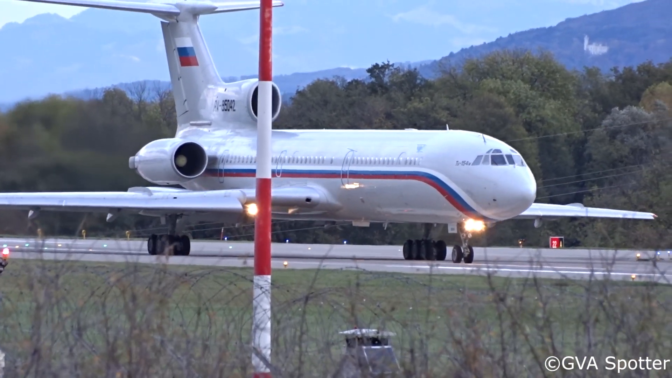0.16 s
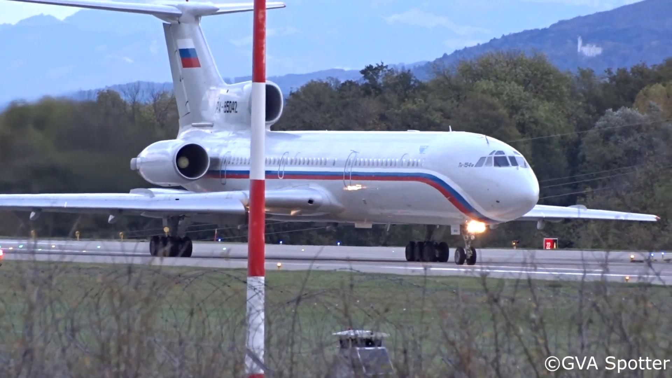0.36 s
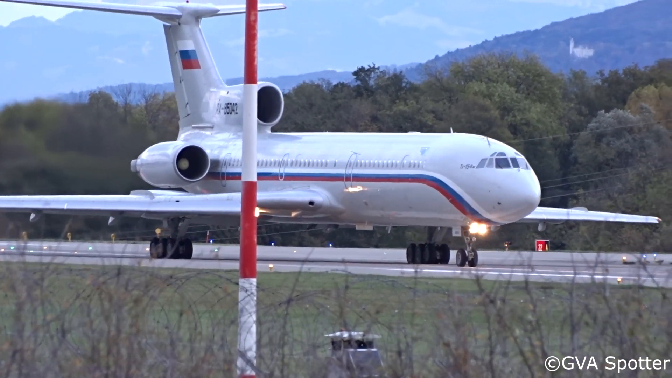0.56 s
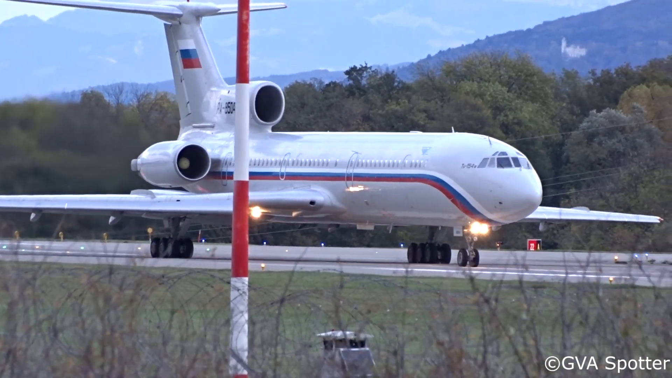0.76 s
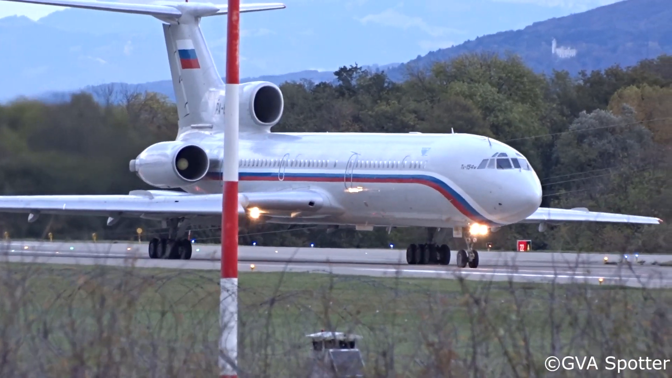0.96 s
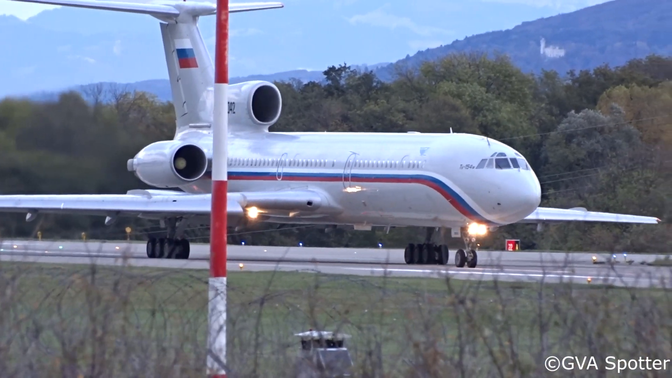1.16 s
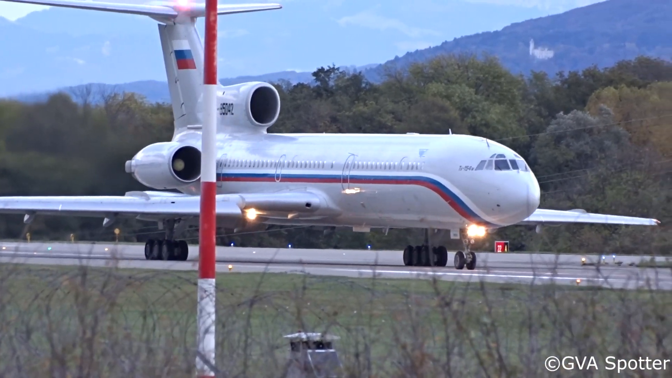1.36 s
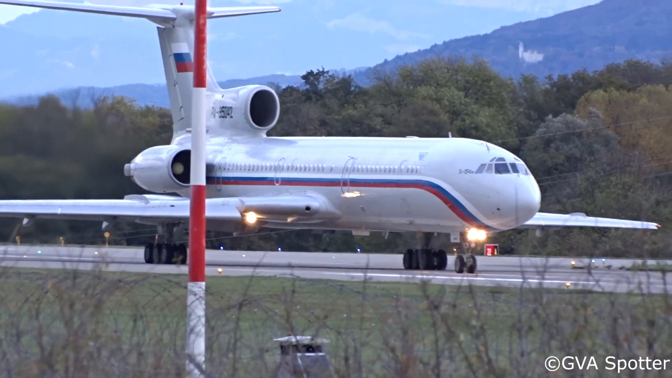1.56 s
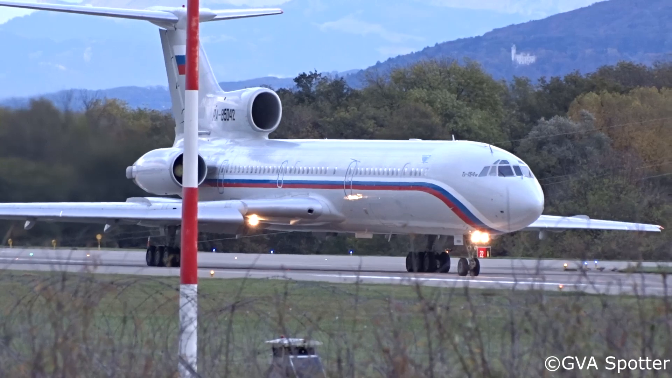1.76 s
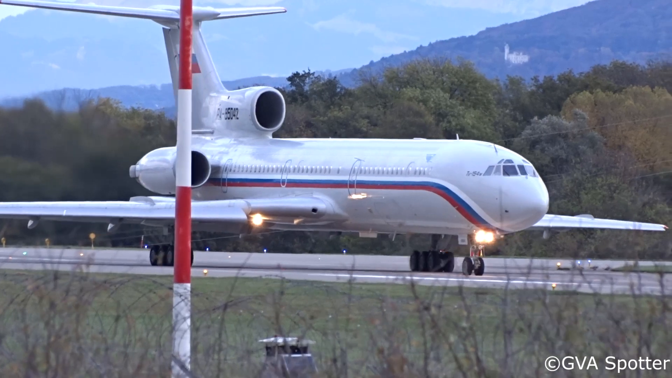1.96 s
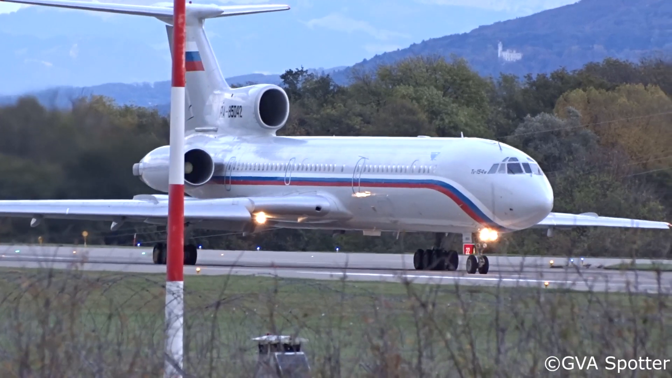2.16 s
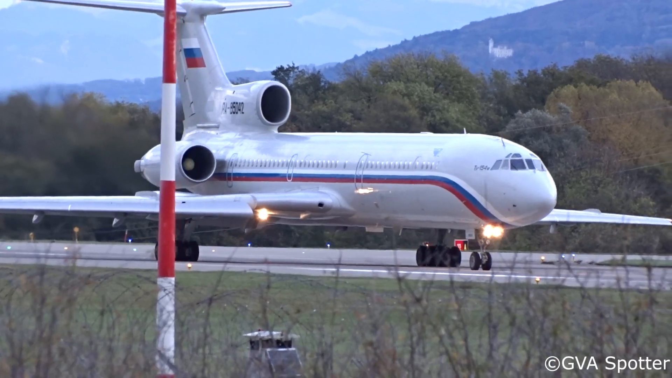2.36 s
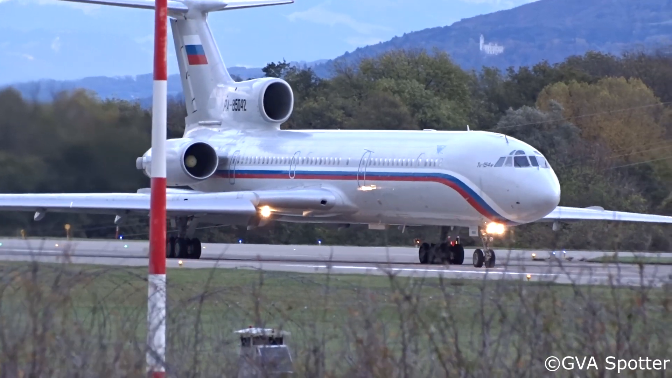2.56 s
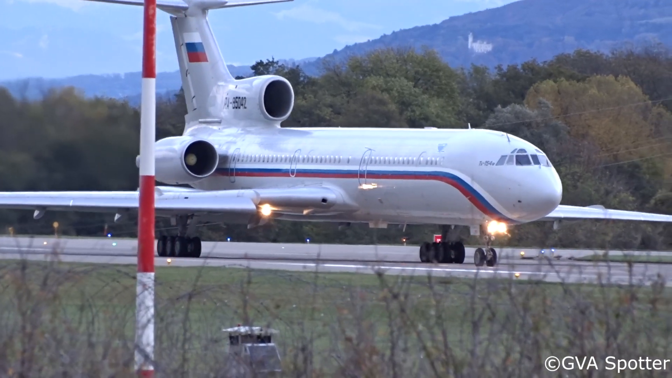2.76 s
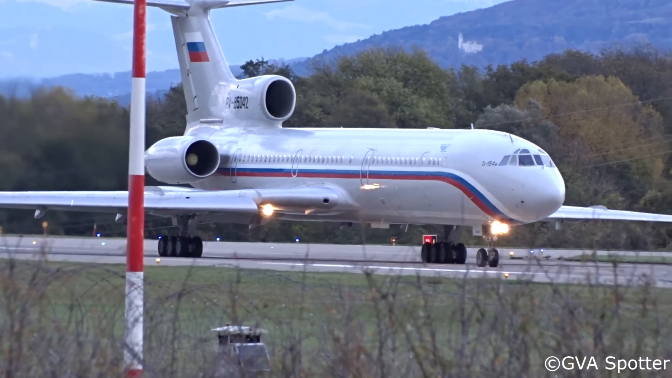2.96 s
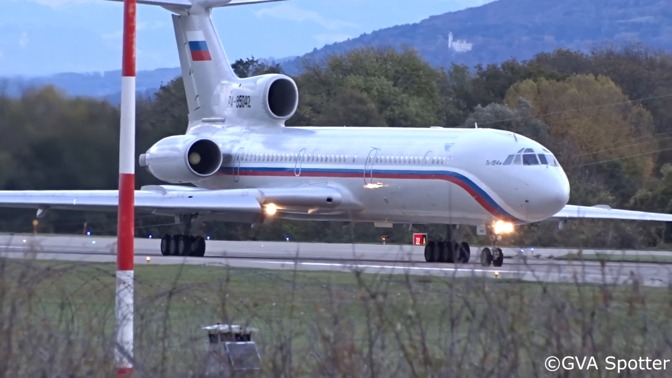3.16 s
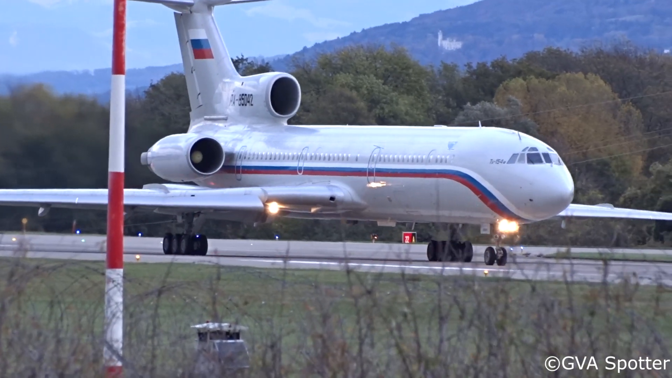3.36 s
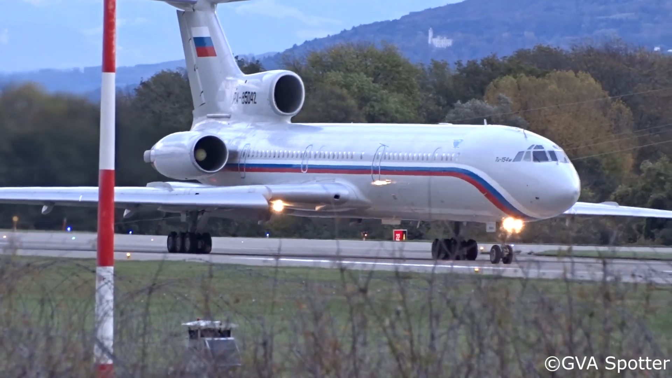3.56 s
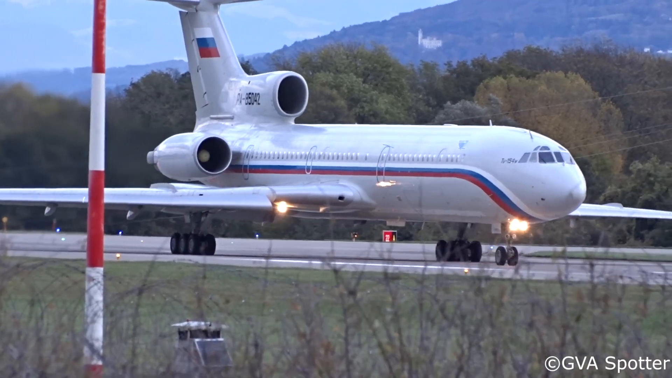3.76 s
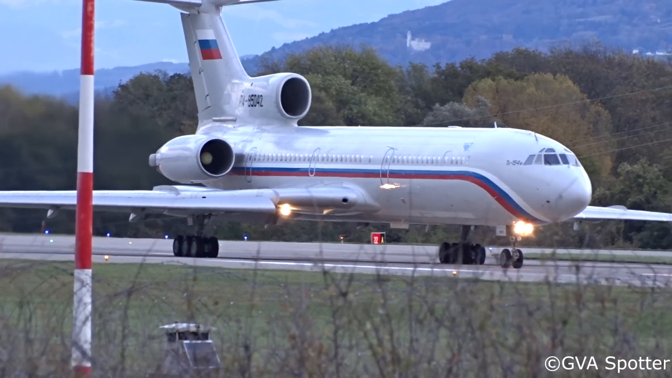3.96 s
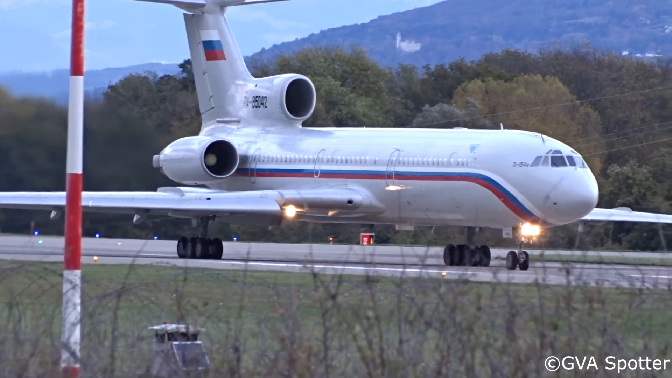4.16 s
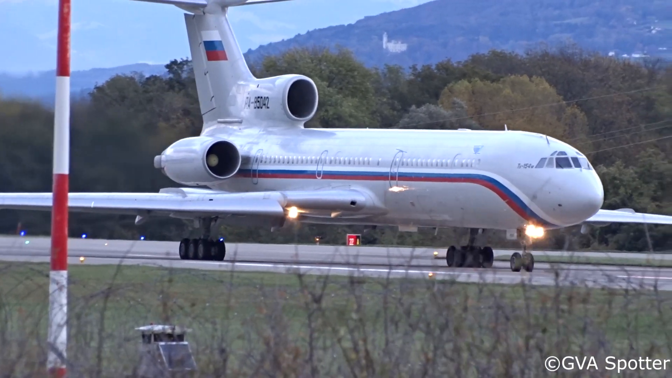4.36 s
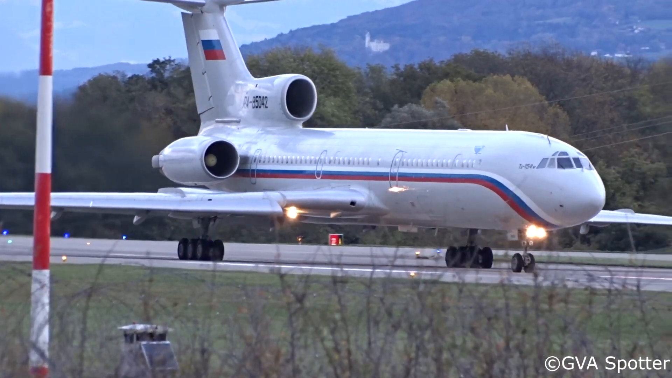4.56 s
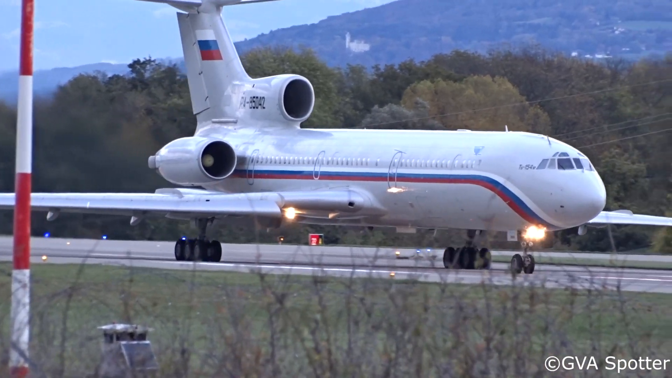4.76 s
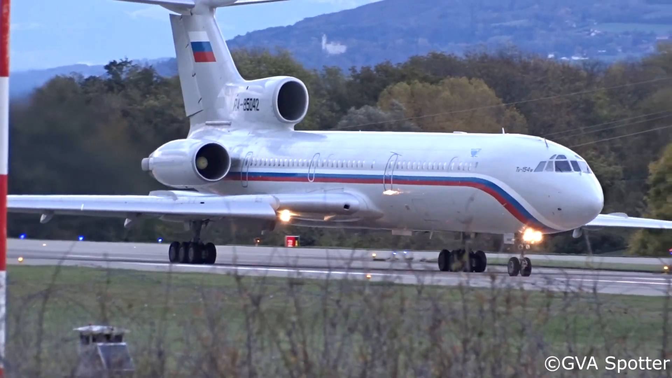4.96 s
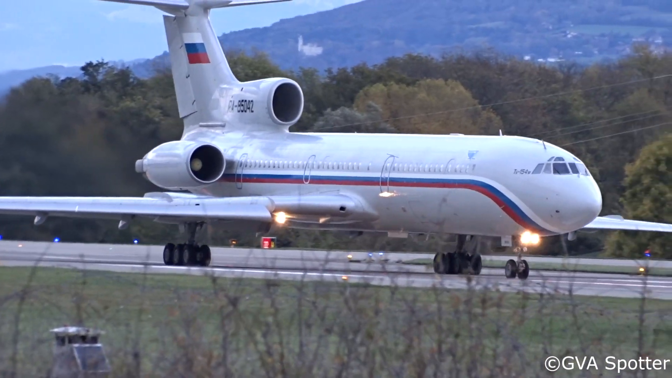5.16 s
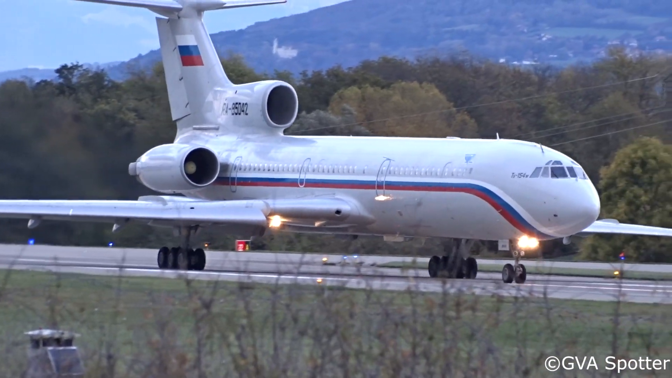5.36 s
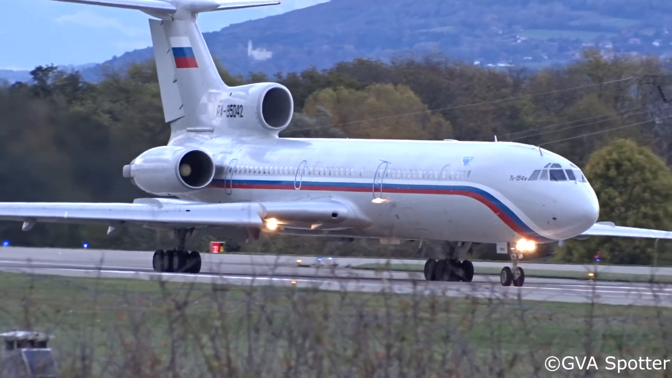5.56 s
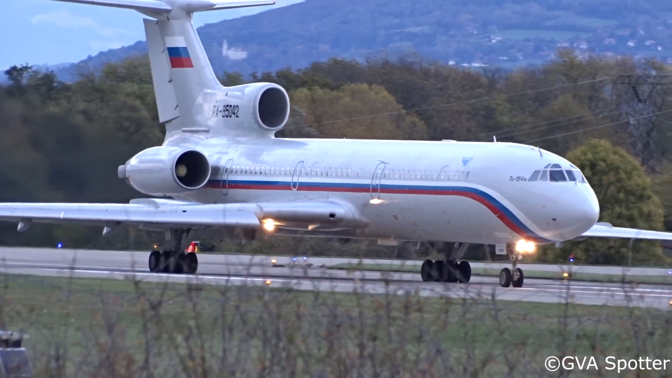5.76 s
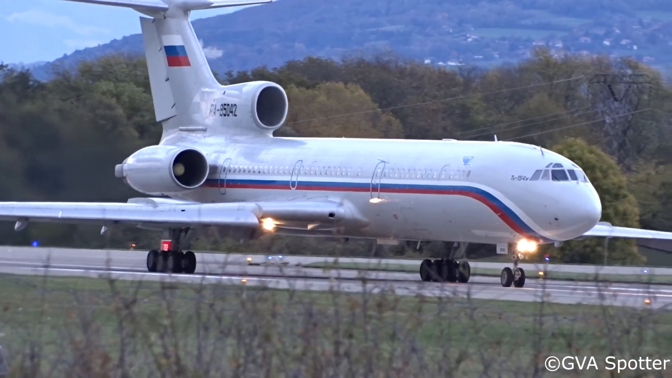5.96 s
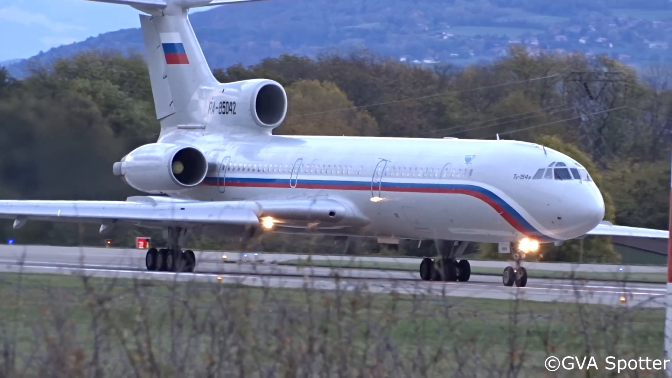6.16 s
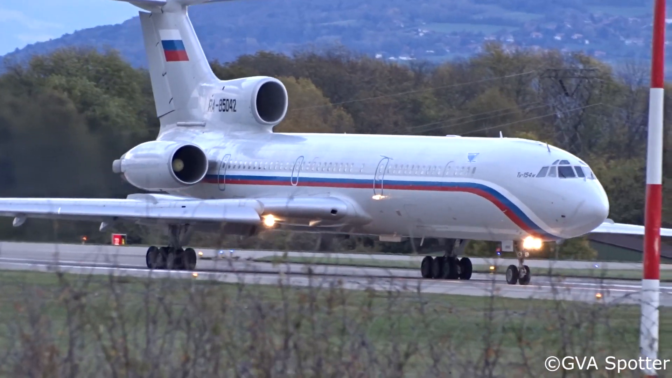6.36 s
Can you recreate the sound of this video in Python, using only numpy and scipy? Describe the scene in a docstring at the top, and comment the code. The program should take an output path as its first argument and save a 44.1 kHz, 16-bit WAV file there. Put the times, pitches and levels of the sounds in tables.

```python
"""A rising whine, a swelling roar and wind buffets: a three-engined jet airliner spools up at the start of its
takeoff roll, heard from outside the airfield fence. Each engine whines with two compressor blade rows; the three
climb about an octave at their own pace and meet again at full power. Turbulent air makes these tones flutter.
Shaped noise makes the exhaust roar, the intake rush, a hiss that grows with engine speed, and the gusts on the
microphone. A faint machine tone and microphone hiss lie underneath, and the level dips briefly three times."""
import sys
import numpy as np
from scipy import signal
from scipy.fft import rfft, irfft
from scipy.io import wavfile

SR = 44100
rng = np.random.default_rng(int(sys.argv[2]) if len(sys.argv) > 2 else 0)


def log_audio(samples):
    """Write samples as a 16-bit WAV file to the path given in sys.argv[1]."""
    # one column per channel
    frames = np.atleast_2d(samples).T
    # limit to full scale, then quantise
    limited = np.clip(frames, -1, 1)
    pcm = np.round(limited * 32767).astype(np.int16)
    wavfile.write(sys.argv[1], SR, pcm)


N = 286650  # length in samples, 6.5 s

# Speed and whine of each engine. Each row: time in seconds, front row's blade-passing pitch in Hz,
# front row level in dB, second row level in dB.
SLOW_ENGINE = [(0.0, 1022, -37, -47), (0.25, 1052, -43.5, -56), (0.4, 1060, -37.5, -37),
               (0.7, 1085, -44.5, -51), (0.95, 1111, -41, -47), (2.0, 1217, -37, -38),
               (2.1, 1228.0, -33.5, -40), (2.7, 1300.0, -32.5, -43), (2.8, 1311, -39.0, -41),
               (2.95, 1340.0, -41.5, -46), (3.1, 1366, -28, -35), (3.2, 1383, -34.0, -48),
               (3.5, 1447, -25.5, -41.0), (3.6, 1475.0, -39.5, -41), (3.85, 1535.0, -26.5, -32),
               (3.95, 1559, -41.5, -40), (4.1, 1607, -25.5, -44), (4.25, 1653, -42, -39.0),
               (4.65, 1750, -26, -36), (4.9, 1804, -33.5, -35.5), (5.25, 1884, -27.5, -39),
               (5.6, 1960.0, -33.5, -56), (5.8, 1994, -20.5, -37), (6.0, 2033.0, -32, -42.0),
               (6.15, 2059, -22, -40.5), (6.5, 2117, -24.5, -42)]
QUICK_ENGINE = [(0.0, 1035, -53, -48), (0.5, 1073, -39, -47), (0.749, 1096, -47.5, -58),
                (0.999, 1130, -39, -32.5), (1.15, 1151, -46.0, -45.5), (1.7, 1217, -39, -45),
                (1.85, 1226.0, -45.5, -35.0), (2.55, 1358.0, -42, -36.5), (3.0, 1469.0, -37.5, -25.5),
                (3.3, 1559.0, -32, -41.0), (3.4, 1591.0, -38.0, -30.0), (3.6, 1639, -43, -35),
                (4.1, 1705, -41, -31), (4.25, 1713.0, -34.5, -45.0), (4.75, 1780, -39, -35.0),
                (5.2, 1878.0, -29, -35), (5.3, 1898.0, -29.5, -29), (5.6, 1964.0, -45, -35.5),
                (5.799, 2008.0, -30, -37), (5.901, 2029.0, -33, -39), (6.35, 2114.0, -37, -39.5),
                (6.5, 2140.0, -22, -51)]
FAINT_ENGINE = [(0.0, 1011.0, -59, -49), (0.75, 1121.0, -46, -49), (1.0, 1157, -41, -48.0),
                (1.25, 1203, -48, -43), (1.4, 1207.0, -41, -44), (2.95, 1555, -54, -46),
                (3.55, 1651, -46, -49.5), (3.85, 1672, -39, -33), (4.45, 1758, -49, -56),
                (5.3, 1918, -29.5, -36), (5.5, 1963.0, -33.5, -42.5), (6.5, 2141.0, -25, -53)]
# Upper whines of each engine, before a shared small lift. Each row: time in seconds, front row's octave in dB,
# sum tone of both rows in dB, front row's third harmonic in dB.
SLOW_UPPER = [(0.0, -48, -60, -63), (0.85, -53.5, -58, -59), (1.25, -44, -61, -55.5),
              (2.15, -51.5, -52.5, -56.0), (3.25, -41.0, -47, -55), (3.45, -43, -50, -56),
              (3.7, -44, -42.5, -58), (4.5, -39.5, -52.5, -57.5), (4.65, -56, -43.5, -60.0),
              (5.3, -42.0, -51, -60.0), (6.15, -48.5, -44, -51), (6.5, -53, -57, -67)]
QUICK_UPPER = [(0.0, -45.5, -47, -61.0), (0.6, -43, -49, -52), (0.7, -52, -50, -49.5),
               (1.55, -51.5, -54, -66), (1.75, -37, -46, -50), (1.9, -52, -54, -56.0),
               (2.15, -37.5, -54, -49.5), (2.65, -43.5, -37.5, -60), (2.75, -41.5, -47.5, -57),
               (3.1, -44.5, -29.5, -55), (3.55, -41.5, -54, -60.0), (3.8, -43.5, -48, -66),
               (4.3, -45.0, -42.5, -55.5), (4.95, -52, -45.5, -62), (5.3, -37, -53, -59.5),
               (6.5, -54, -58, -64.5)]
FAINT_UPPER = [(0, -57, -62, -60), (2.5, -51, -51, -60), (3.5, -51.5, -58, -64), (5.3, -39.5, -59, -60),
               (6.5, -51.5, -49.5, -64)]
FRONT_BLADES, SECOND_BLADES = 37, 42
FULL_SPEED_HZ = 2140  # front row's blade-passing pitch
# Weaker tones around the blade rows. Each row: cycles per shaft turn, dB at full speed against the mean of
# the two rows' dB levels.
SIDE_TONES = [(32, -14.5), (33, -10), (35, -16), (39, -18.5), (44, -22.5), (46, -12)]
# Fainter overtones and sum tones. Each row: multiple of the front row, multiple of the second row, relative dB.
OVERTONES = [(0, 2, -4.5), (2, 1, -13), (1, 2, -12), (4, 0, -13), (3, 1, -15.5), (2, 2, -19.5),
             (5, 0, -21.5)]
OVERTONE_DB, OVERTONE_GROWTH_DB = -45, 6.5  # base level at full speed; rise per octave of engine speed
# The air and the intake lining swallow the higher overtones. Each row: pitch in Hz, gain in dB.
ABSORPTION = [(3000, 2), (3500, 0), (4000, -3), (4700, -8), (6300, -6.5), (7400, -11), (8400, -16),
              (9400, -51.5), (11000, -47.5)]

# Broadband noise of the engines. Each row: time in seconds, exhaust roar in dB, intake rush in dB.
THRUST = [(0, -38, -47.5), (1.5, -41.5, -42.5), (2.2, -42, -42), (3.2, -42.5, -37.5), (3.7, -39.5, -38),
          (4.8, -39, -33.5), (5.3, -35.5, -35), (5.7, -38.5, -32.5), (6.0, -36, -34), (6.5, -34, -38)]
# Colours of the engine noise; in the roar the ground reflection cuts a notch near 780 Hz.
# Each row: frequency in Hz, relative dB per Hz.
ROAR_COLOUR = [(30, -3.5), (120, 1.5), (250, -5), (450, -3.5), (620, 0.5), (770, -2.5), (950, 1.5),
               (1300, 1.5), (2000, -4), (2800, -7.5), (4000, -15), (6000, -34.5)]
RUSH_COLOUR = [(1000, -24), (1700, 4), (2600, 0), (3050, -3.5), (3650, -4), (4500, -13.5), (6000, -20),
               (9000, -50)]
HISS_COLOUR = [(2500, -29.5), (4500, 1), (5200, -3.5), (6100, -2.5), (7000, -5.5), (8300, -18), (9500, -31),
               (12000, -52.5)]
HISS_DB, HISS_GROWTH_DB = -50.5, 16.5  # level at full speed; rise per octave of engine speed
# How alike left and right are. Each row: frequency in Hz, likeness from -1 (opposite) to 1 (same).
JET_LIKENESS = [(60, 0.61), (400, 0.6), (1000, 0.89), (3000, .99), (10000, 1)]
WIND_LIKENESS = [(30, .94), (60, 0.93), (110, 0.19), (200, -0.32), (400, -0.53), (900, -0.86)]

# Gusts on the microphone, before small trims. Each row: time of the peak in seconds, length in seconds,
# thump in dB, flutter in dB.
GUSTS = [(0.223, 0.07, -34.5, -34.5), (0.415, 0.082, -35, -44), (0.712, .07, -39.5, -35.5),
         (0.838, 0.027, -26.5, -29.5), (0.983, 0.13, -31.5, -37), (1.275, 0.24, -34.5, -37),
         (1.602, 0.34, -30.5, -41.5), (2.052, 0.19, -29.5, -36), (2.285, .2, -35, -35),
         (2.63, 0.11, -35, -35.5), (2.802, 0.17, -26.5, -28.5), (3.005, 0.19, -27, -31),
         (3.255, 0.17, -30.5, -34), (3.767, 0.085, -35.5, -42.5), (3.984, .1, -32, -35.5),
         (4.21, .16, -31.5, -35), (4.478, 0.24, -27.5, -29.5), (4.85, 0.087, -33, -39.5),
         (5.057, 0.062, -33, -42.5), (5.425, .3, -32.5, -36), (5.642, 0.27, -30, -35),
         (5.95, 0.11, -29, -35.5), (6.284, .14, -36, -35.5)]
# Colours of the wind noise. Each row: frequency in Hz, relative dB per Hz.
THUMP_COLOUR = [(15, -12), (28, -6), (45, -1), (70, 0.5), (110, -2), (180, -8.5), (400, -40)]
FLUTTER_COLOUR = [(40, -16.5), (80, -5.5), (140, -0.5), (220, -0.5), (350, -5.5), (550, -8.5), (900, -17.5),
                  (2000, -32.5)]
# Thump and flutter between the gusts at the start, before the same trims, and their steady growth.
BREEZE_DB, BREEZE_FLUTTER_DB, BREEZE_GROWTH_DB_PER_S = -42.5, -46, 0.84

# A faint steady-pitched machine tone on the airfield, before a small lift. Each row: time in seconds, level in dB.
DRONE = [(0.0, -55), (0.6, -47.5), (0.9, -70), (1.4, -54.5), (2.5, -61.5), (3.3, -52.5), (4.0, -62),
         (4.9, -47.5), (5.6, -58), (6.5, -51.5)]
DRONE_HZ = 654
# Colour of the microphone's own hiss. Each row: frequency in Hz, relative dB per Hz.
MIC_HISS_COLOUR = [(3000, -8.5), (9000, -3), (11000, -4), (15500, 1.5)]
# The whole sound dips briefly and comes back. Each row: time in seconds, depth in dB, recovery time in seconds.
DIPS = [(2.72, 5, 0.53), (4.39, 2.5, 0.44), (5.65, 1.5, 0.17)]
DIP_ATTACK_S = 0.031
CUTOFF_HZ = 15800


def from_db(db):
    """Decibels to gain."""
    return 10 ** (np.asarray(db) / 20)


def rms_one(x):
    """Scale to unit power."""
    return x / np.sqrt(np.mean(np.abs(x) ** 2) + 1e-20)


def in_time(rows):
    """Draw each column of a timed table as a curve, sample by sample."""
    s, *columns = np.transpose(rows)
    return [np.interp(np.arange(N) / SR, s, column) for column in columns]


def at_hz(points, hz):
    """Read a spectrum on a log-frequency axis, since we hear pitch in ratios."""
    f, value = np.transpose(points)
    return np.interp(np.log(hz), np.log(f), value)


def drift(rate_hz):
    """Slow random wandering of spread 1: noise smoothed twice, made at one value per 20 samples."""
    r = np.exp(-2 * np.pi * rate_hz * 20 / SR)
    raw = rng.standard_normal(N // 20 + 3002)
    slow = signal.lfilter([1], [1, -2 * r, r * r], raw)[3000:]  # drop the filter's start-up
    return np.interp(np.arange(N) / 20, np.arange(len(slow)), rms_one(slow))


def pan(left_db):
    """Channel gains for a left-minus-right level."""
    return from_db([[left_db / 2], [-left_db / 2]])


def noise(colour, likeness):
    """Stereo noise of a given colour and left-right likeness; its middle has rms 1."""
    hz = np.maximum(np.fft.rfftfreq(N, 1 / SR), 1)
    # fade out below the first and above the last point of the colour
    beyond = np.minimum(1, hz / colour[0][0]) * np.minimum(1, colour[-1][0] / hz)
    gain = from_db(at_hz(colour, hz)) * beyond ** 3
    alike = np.clip(at_hz(likeness, hz), -.99, .999)
    white = rfft(rng.standard_normal((2, N)))
    # a strong middle makes the sides alike, a strong difference makes them opposite
    mid, side = irfft(white * gain * np.sqrt([1 + alike, 1 - alike]), N)
    return np.array([mid + side, mid - side]) / mid.std()


def narrow_noise(phase, width_hz):
    """A band of noise centred on a moving tone; rms 1."""
    return drift(width_hz) * np.cos(phase) + drift(width_hz) * np.sin(phase)


def blade_tone(phase, flutter_db, flutter_rate, wander, scatter, scatter_hz):
    """A tone heard through eddies: its level and phase waver, and part of it is scattered into a skirt."""
    level = from_db(flutter_db * drift(flutter_rate))
    direct = rms_one(level * np.sin(phase + wander * drift(6.0)))
    return direct + scatter * narrow_noise(phase, scatter_hz)


def octaves_below_full(blade_hz):
    """Shaft speed in doublings: 0 at full speed, negative below it."""
    return np.log2(blade_hz / FULL_SPEED_HZ)


def engine(table, upper_table, overtones_db):
    """Two blade rows on one shaft, their sum tones, and the noise of turbulence chopped by the blades."""
    blade_hz, front_db, second_db = in_time(table)
    octave_db, sum_db, third_db = in_time(upper_table)
    shaft = 2 * np.pi * np.cumsum(blade_hz) / SR / FRONT_BLADES
    speed, spool = blade_hz / FULL_SPEED_HZ, octaves_below_full(blade_hz)
    front, second = FRONT_BLADES * shaft, SECOND_BLADES * shaft
    out = np.zeros(N)
    for phase, db in (front, front_db), (second, second_db):
        tone = blade_tone(phase, flutter_db=3.0, flutter_rate=15, wander=0.49, scatter=0.28, scatter_hz=70)
        out += from_db(db) * tone
    for phase, db in (2 * front, octave_db), (front + second, sum_db), (3 * front, third_db):
        tone = blade_tone(phase, flutter_db=3.5, flutter_rate=12, wander=.9, scatter=0.39, scatter_hz=65)
        out += from_db(db + 0.9) * tone
    # uneven blades sound other shaft orders, more so near full speed
    for order, db in SIDE_TONES:
        level = from_db((front_db + second_db) / 2 + db) * speed ** 3.3
        out += level * narrow_noise(round(order) * shaft, width_hz=8.1)
    # higher overtones blur in proportion to their shaft order
    for fronts, seconds, db in OVERTONES:
        order = round(fronts) * FRONT_BLADES + round(seconds) * SECOND_BLADES
        carried_db = at_hz(ABSORPTION, order * blade_hz / FRONT_BLADES)
        level_db = OVERTONE_DB + OVERTONE_GROWTH_DB * spool + overtones_db + db + carried_db
        out += from_db(level_db) * narrow_noise(order * shaft, width_hz=0.13 * order)
    # the chopped turbulence forms broad humps that grow with shaft speed
    humps = from_db(-38) * narrow_noise(1.03 * front, width_hz=280)
    humps += from_db(-41.0) * narrow_noise(1.97 * front, width_hz=193)
    humps += from_db(-56.5) * narrow_noise(3.04 * front, width_hz=320)
    humps += from_db(-72.5) * narrow_noise(3.96 * front, width_hz=210)
    return out + humps * speed ** 2.42


def airliner():
    """Three whines over the exhaust roar and intake rush; the hiss grows with the engines' mean speed."""
    whine = engine(SLOW_ENGINE, SLOW_UPPER, overtones_db=0.6)
    whine += engine(QUICK_ENGINE, QUICK_UPPER, overtones_db=1.7)
    whine += engine(FAINT_ENGINE, FAINT_UPPER, overtones_db=-1.5)
    roar_db, rush_db = in_time(THRUST)
    roar = from_db(roar_db) * noise(ROAR_COLOUR, JET_LIKENESS) * pan(-0.57)
    rush = from_db(rush_db) * noise(RUSH_COLOUR, JET_LIKENESS) * pan(-.3)
    speeds_hz = [in_time(table)[0] for table in (SLOW_ENGINE, QUICK_ENGINE, FAINT_ENGINE)]
    spool = octaves_below_full(np.mean(speeds_hz, axis=0))
    hiss = from_db(HISS_DB + HISS_GROWTH_DB * spool) * noise(HISS_COLOUR, JET_LIKENESS)
    shimmer = from_db(1.1 * drift(5.2))  # moving air along the path
    # a faint echo of the whine comes in from the side, 45 ms late and opposite in the two channels
    echo = from_db(-25.0) * np.interp(np.arange(N) - .045 * SR, np.arange(N), whine, left=0)
    return whine * pan(-.8) + echo * [[1], [-1]] + shimmer * (roar + rush + hiss)


def wind_strength():
    """Bell-shaped gusts add their power to a slowly freshening breeze; gains of thump and flutter."""
    t = np.arange(N) / SR
    breeze_db = np.array([[BREEZE_DB], [BREEZE_FLUTTER_DB]]) + BREEZE_GROWTH_DB_PER_S * t
    power = from_db(breeze_db) ** 2
    for s, length, thump_db, flutter_db in GUSTS:
        bell = np.exp(-(2 * (t - s) / length) ** 2)
        power += from_db([[thump_db], [flutter_db]]) ** 2 * bell
    return np.sqrt(power)


def wind():
    """Eddies thump both microphone ports together and flutter between them in opposite phase."""
    thump_gain, flutter_gain = wind_strength()
    thump_gain = thump_gain * from_db(-2.0 + 1.1 * drift(12))
    flutter_gain = flutter_gain * from_db(-0.63 + 3.16 * drift(26))
    thump = thump_gain * noise(THUMP_COLOUR, WIND_LIKENESS) * pan(-6.0)
    flutter = flutter_gain * noise(FLUTTER_COLOUR, WIND_LIKENESS) * pan(0.47)
    return thump + flutter


def drone():
    """A faint machine tone of steady pitch whose level wavers and whose edges are blurred by scattering."""
    level_db, = in_time(DRONE)
    phase = 2 * np.pi * DRONE_HZ * np.arange(N) / SR
    tone = blade_tone(phase, flutter_db=2.0, flutter_rate=7.5, wander=0.1, scatter=0.43, scatter_hz=12)
    return from_db(level_db + 0.5) * tone


def microphone_hiss():
    """The microphone's own faint, steady high noise."""
    return from_db(-70.0) * noise(MIC_HISS_COLOUR, JET_LIKENESS)


def scene():
    """Aircraft, wind, airfield tone and the microphone's own hiss."""
    return airliner() + wind() + drone() + microphone_hiss()


def dips():
    """A gain that drops quickly at each dip and creeps back."""
    t = np.arange(N) / SR
    drop_db = np.zeros(N)
    for s, depth_db, recovery_s in DIPS:
        attack = np.clip((t - s) / DIP_ATTACK_S, 0, 1)
        drop_db += depth_db * attack * np.exp(-np.maximum(t - s, 0) / recovery_s)
    return from_db(-drop_db)


def record(dry):
    """The level dips now and then; a steep low-pass filter cuts the top."""
    steep_cut = signal.ellip(12, .1, 90, CUTOFF_HZ, fs=SR, output="sos")
    return signal.sosfilt(steep_cut, dry * dips())


dry = scene()
out = record(dry)
log_audio(out)
```